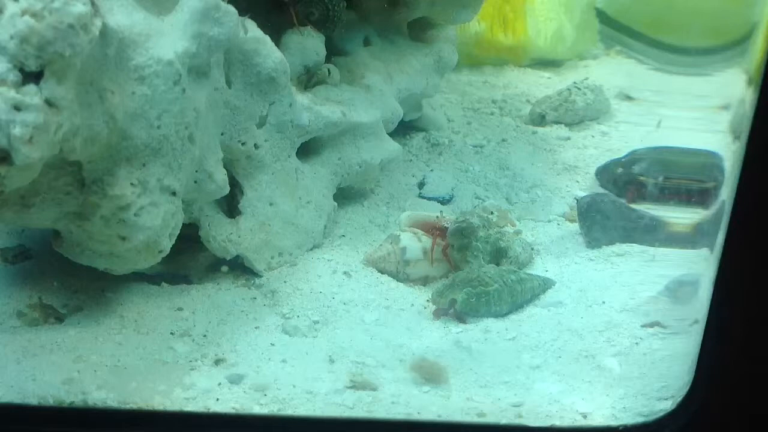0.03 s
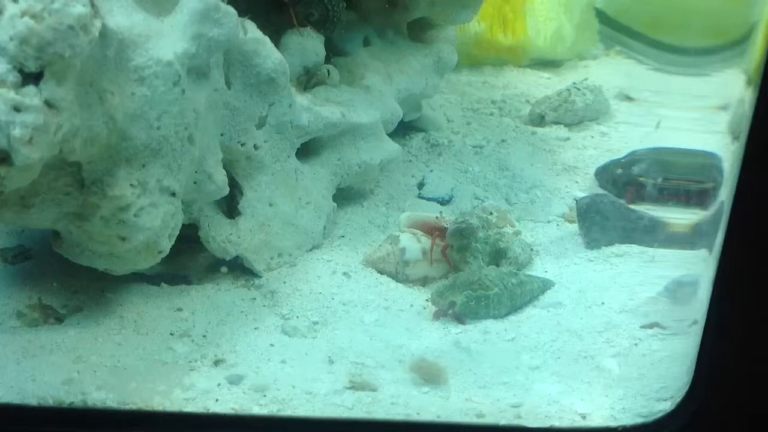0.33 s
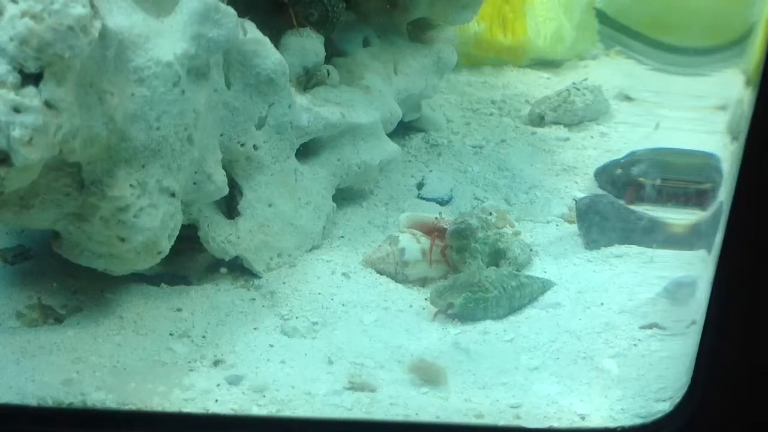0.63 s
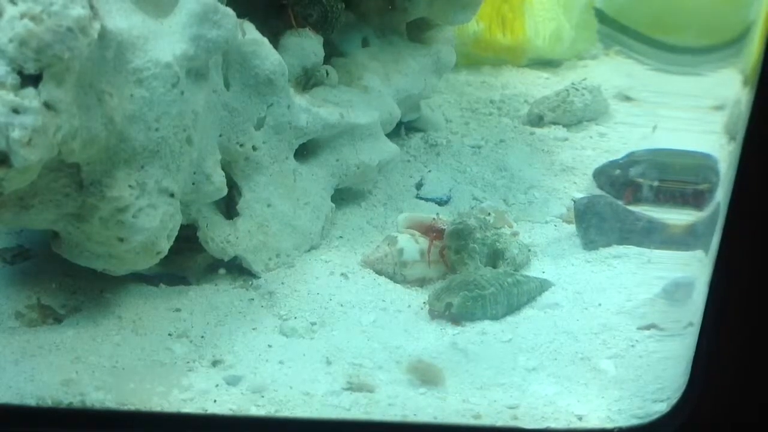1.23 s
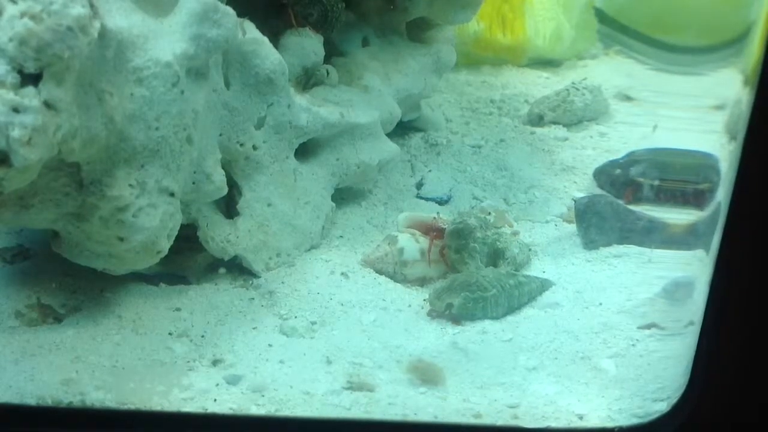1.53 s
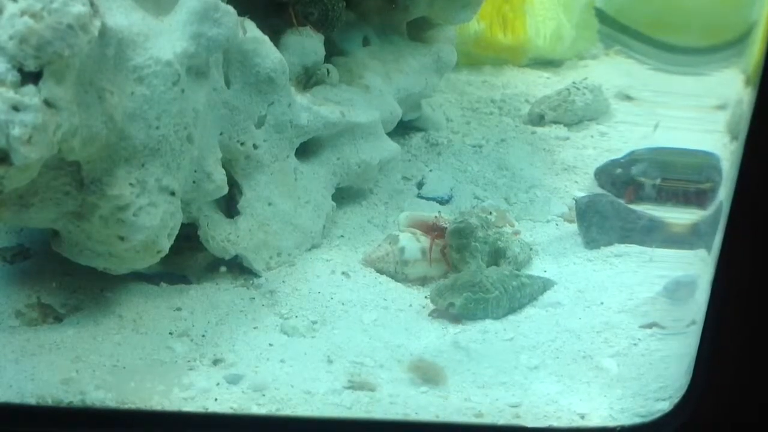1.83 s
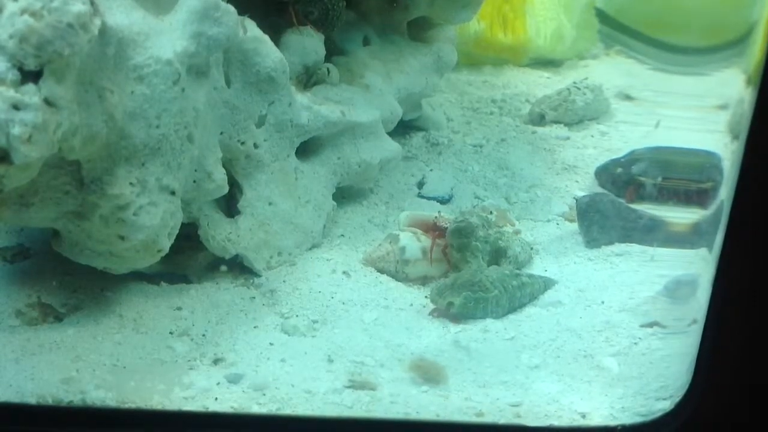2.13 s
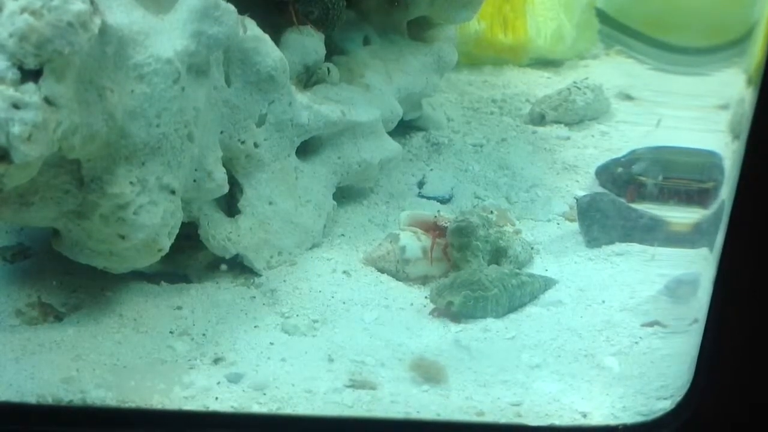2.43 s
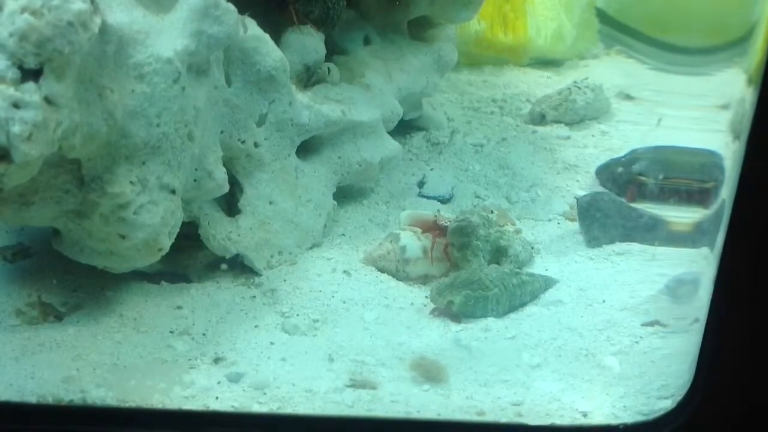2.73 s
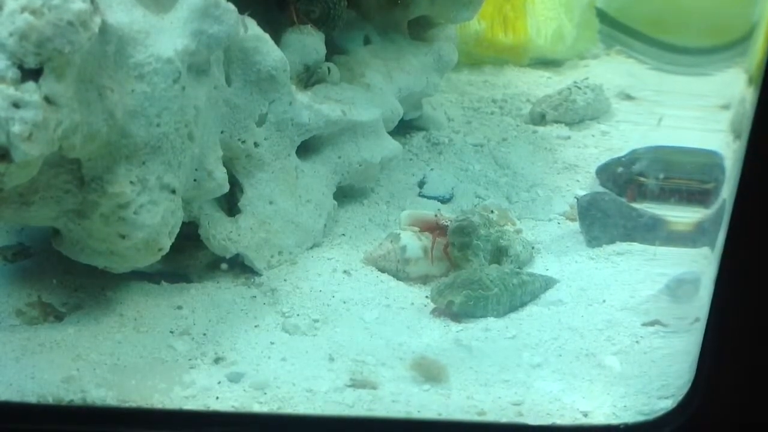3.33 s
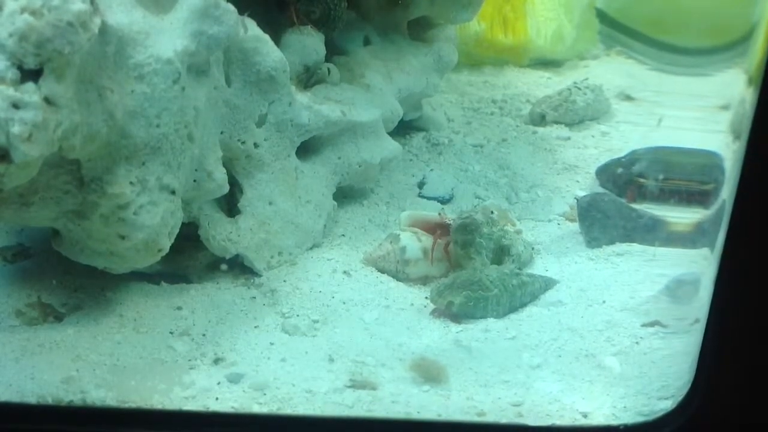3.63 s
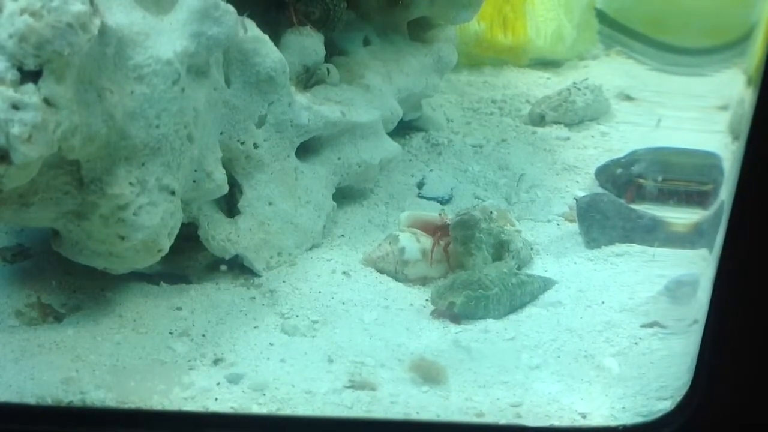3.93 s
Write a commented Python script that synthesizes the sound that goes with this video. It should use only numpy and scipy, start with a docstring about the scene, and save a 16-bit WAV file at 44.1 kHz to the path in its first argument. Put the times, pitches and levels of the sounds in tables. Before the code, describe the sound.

An aquarium pump hums and drones under steady hiss, with a tick and dull taps.

```python
"""A low hum and watery drone under even hiss: an aquarium in a quiet room, close to the glass.
The pump hums at multiples of the mains; its moving water drones in the tank with a soft wash.
Past halfway a small hard thing ticks sharply, then a few dull taps ring the tank, the loudest with
a weaker tick on it; the room answers faintly. Microphone hiss and a faint electronic whine lie
over it all. Mono, fading in at the start."""
import sys
import numpy as np
from scipy import signal
from scipy.fft import rfft, irfft, next_fast_len
from scipy.io import wavfile
from scipy.ndimage import map_coordinates

SR = 44100
rng = np.random.default_rng(int(sys.argv[2]) if len(sys.argv) > 2 else 0)


def pcm_store(signal):
    """Save signal as 16-bit PCM."""
    levels = np.round(np.clip(np.atleast_2d(signal), -1, 1) * 32767)
    wavfile.write(sys.argv[1], SR, levels.astype(np.int16).T)


N = 176400
T = np.arange(N) / SR


def amp(db):
    """dB to gain."""
    return 10 ** (np.asarray(db) / 20)


def butter(hz, kind, order):
    """Butterworth high- or low-pass sections."""
    return signal.butter(order, min(hz, SR / 2 - 1), kind, fs=SR, output="sos")


def filtered(x, response):
    """x shaped by the gain response(f/Hz)."""
    n_fft = next_fast_len(N + 8192)
    hz = np.fft.rfftfreq(n_fft, 1 / SR)
    return irfft(rfft(x, n_fft) * response(hz), n_fft)[..., :N]


def noise(spectrum):
    """Unit-rms noise coloured by (f/Hz, density/dB) points."""
    knot_hz, knot_db = np.transpose(spectrum)
    white = rng.standard_normal(N)
    x = filtered(white, lambda hz: amp(np.interp(np.log(hz + 1), np.log(knot_hz + 1), knot_db)))
    return x / x.std()


def wobble(rate_hz):
    """Smooth random curve, rms about 1, rate_hz knots per second."""
    return map_coordinates(rng.standard_normal(256), [T * rate_hz], mode="wrap")


def tone(hz):
    """Unit-rms sine, random phase."""
    return np.sqrt(2) * np.sin(2 * np.pi * (hz * T + rng.random()))


def pump(mains_hz=49.95, waver_db=0.6):
    """Pump hum: mains harmonics, each wavering slightly in level."""
    # mains multiple, level/dB
    harmonics = [(2, -59.5), (3, -64), (4, -61.5), (5, -62.5), (6, -53), (8, -67.5), (9, -78), (10, -84.5),
                 (12, -69), (14, -65), (16, -75), (18, -73.5), (20, -78)]
    return sum(amp(db + waver_db * wobble(rate_hz=3.35)) * tone(k * mains_hz) for k, db in harmonics)


def water_drone(waver_db=1.2):
    """Running filter and tank: low noise, slowly swelling and a little restless."""
    # f/Hz, relative density/dB
    spectrum = [(25, -47), (45, -34.5), (80, -22), (120, -12.5), (165, -10), (215, -3), (270, -0.5),
                (322, 0), (345, -8), (420, -19), (490, -15), (565, -13.5), (650, -18.5), (850, -21),
                (1100, -28.5), (2000, -41)]
    # t/s, level/dB
    swell = [(.3, -49.5), (.85, -45.5), (1.45, -48), (1.85, -49), (2.15, -47), (2.5, -49.5), (3.1, -48),
             (4, -47.5)]
    swell_db = np.interp(T, *np.transpose(swell))
    return noise(spectrum) * amp(swell_db + waver_db * wobble(rate_hz=11))


def water_wash(level_db=-59.5, waver_db=0.7):
    """Moving water: soft, wavering midrange noise."""
    # f/Hz, relative density/dB
    spectrum = [(300, -22), (700, -1.5), (1100, 0), (1500, -1.5), (1800, -2), (2170, 1), (2500, -6),
                (3500, -7.5), (8000, -26)]
    return noise(spectrum) * amp(level_db + waver_db * wobble(rate_hz=14))


def microphone_hiss(level_db=-51):
    """Steady, nearly white microphone noise."""
    # f/Hz, relative density/dB
    spectrum = [(30, -10), (300, 4), (3000, -0.5), (6000, 0.5), (11000, -.8), (14400, -1.4), (15300, -7.5)]
    return amp(level_db) * noise(spectrum)


def electronics_whine():
    """Faint, steady high tones from the electronics."""
    # f/Hz, level/dB
    tones = [(4345, -79), (5094, -95), (14085, -85), (14185, -82.5)]
    return sum(amp(db) * tone(hz) for hz, db in tones)


def struck(blows, modes, low_hz):
    """Blows ring a body's damped modes; softer contact cuts the highs. Little radiates below low_hz."""
    t = np.arange(SR // 8) / SR
    ring = sum(amp(db - 60 * t / t60_s) * np.cos(2 * np.pi * hz * t) for hz, db, t60_s in modes)
    ring = signal.sosfilt(butter(low_hz, "high", order=2), ring)
    out = np.zeros(N + SR)
    for start_s, gain_db, cutoff_hz in blows:
        blow = signal.sosfilt(butter(cutoff_hz, "low", order=7), ring)
        start = round(start_s * SR)
        out[start:start + len(t)] += amp(gain_db) * blow
    return out[:N]


def ticks():
    """Hard contacts ring the high, brief modes of a small hard thing."""
    # t/s, gain/dB, contact cut-off/Hz
    blows = [(2.3509, -22.5, 8550), (2.3522, -35, 13000), (2.3537, -31.5, 11100), (2.6546, -29.5, 6160)]
    # f/Hz, gain/dB, t60/s
    modes = [(2080, -27, 0.0038), (3100, -15, 0.0035), (4750, -10, 0.0024), (5870, 0, 0.0041),
             (8180, -8.5, 0.012), (8950, -11, 0.0064), (10840, -11, 0.0085)]
    return struck(blows, modes, low_hz=1730)


def tank_taps():
    """Dull taps ring the tank's low modes."""
    # t/s, gain/dB, contact cut-off/Hz
    blows = [(2.6374, -27.5, 1870), (2.6546, -11.5, 1940), (2.6675, -32, 1900), (2.6732, -35, 2200),
             (2.9708, -20, 1290)]
    # f/Hz, gain/dB, t60/s
    modes = [(189, -13.5, 0.032), (464, -15, 0.011), (554, -8.5, 0.013), (706, -25.5, 0.01),
             (1270, -11.5, 0.0055), (1650, -7, 0.0044)]
    return struck(blows, modes, low_hz=128)


def room(x, t60_s=0.055, tail_db=-10.5, delay_s=0.0035):
    """Direct sound plus a short, weak tail from the walls."""
    t = np.arange(SR // 4) / SR
    tail = rng.standard_normal(len(t)) * amp(-60 * t / t60_s) * (t > delay_s)
    tail /= np.linalg.norm(tail)
    return x + amp(tail_db) * signal.fftconvolve(x, tail)[:N]


def scene():
    """Pump, water, ticks and taps, alike in both channels."""
    mono = pump() + water_drone() + water_wash() + room(ticks() + tank_taps())
    return np.array([mono, mono])


def record(dry):
    """Recorder: adds hiss and whine, fades in, limits the band."""
    fade_start_s, fade_s, top_hz = 0.11, 0.13, 15350
    noisy = dry + microphone_hiss() + electronics_whine()
    fade = np.clip((T - fade_start_s) / fade_s, 0, 1)
    return filtered(noisy * fade, lambda hz: hz < top_hz)


dry = scene()
out = record(dry)
pcm_store(out)
```